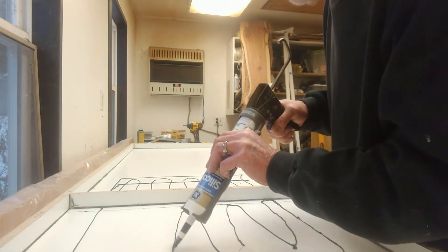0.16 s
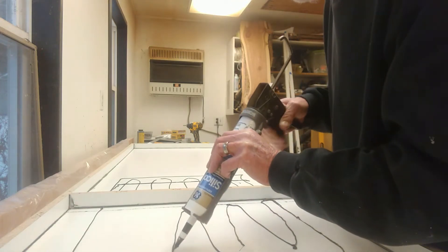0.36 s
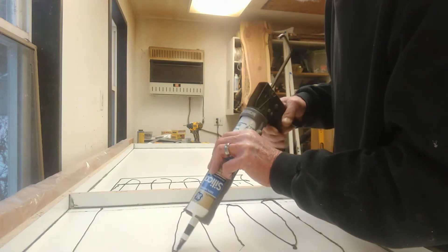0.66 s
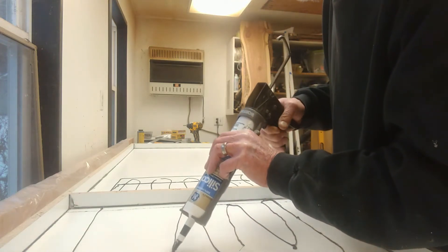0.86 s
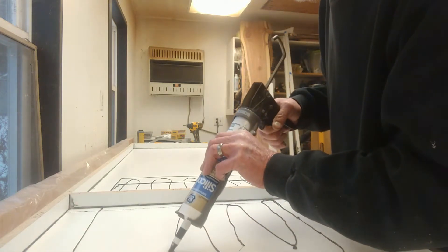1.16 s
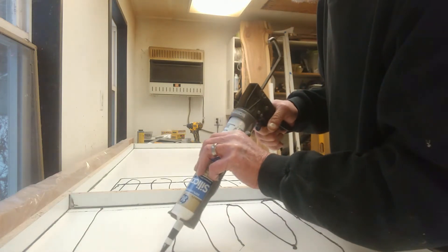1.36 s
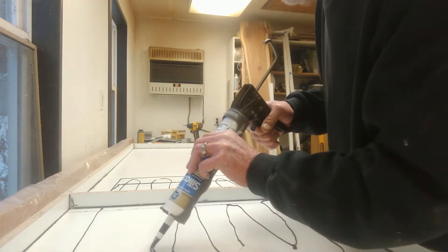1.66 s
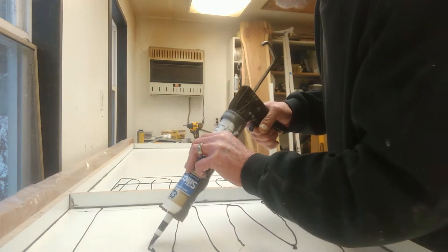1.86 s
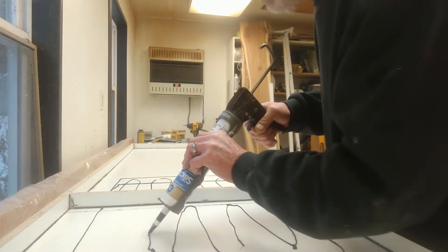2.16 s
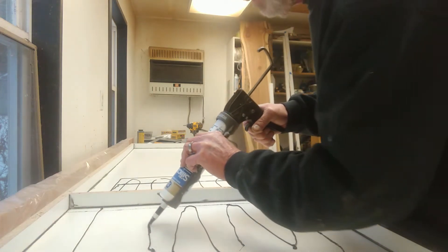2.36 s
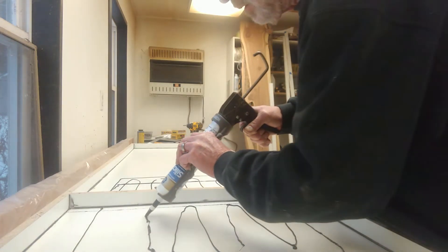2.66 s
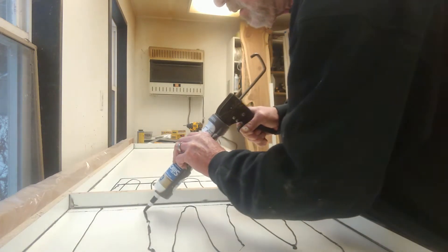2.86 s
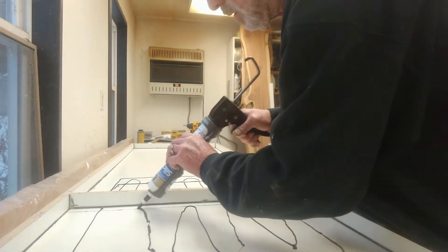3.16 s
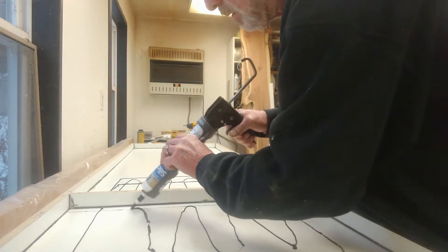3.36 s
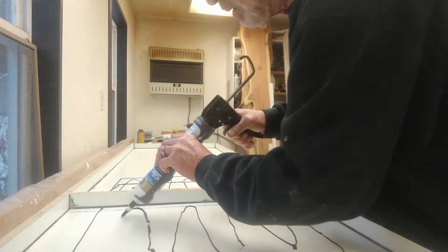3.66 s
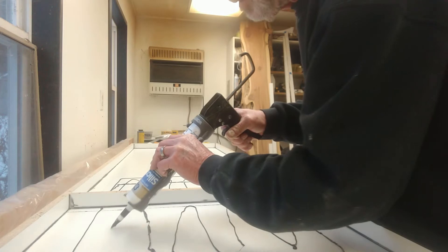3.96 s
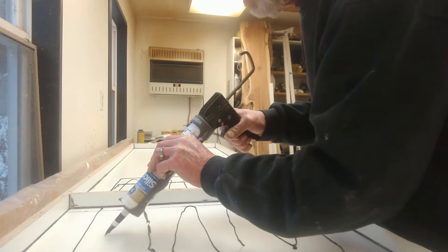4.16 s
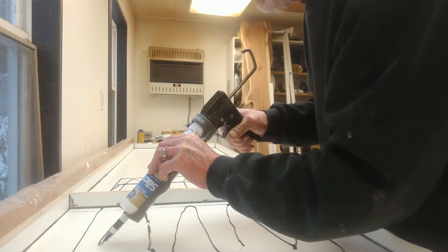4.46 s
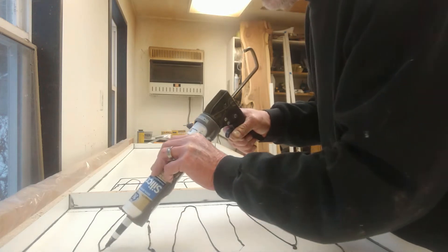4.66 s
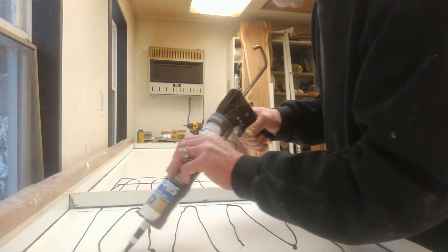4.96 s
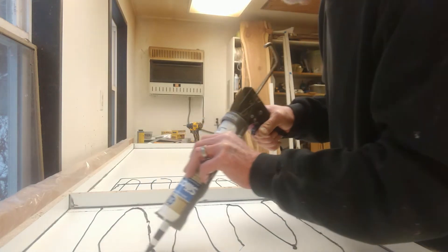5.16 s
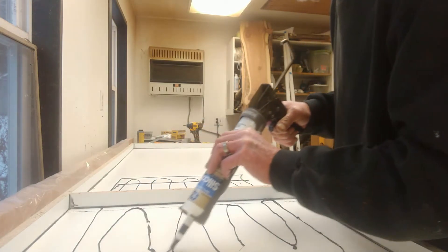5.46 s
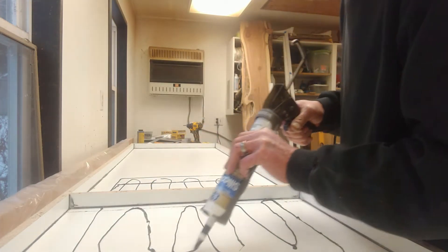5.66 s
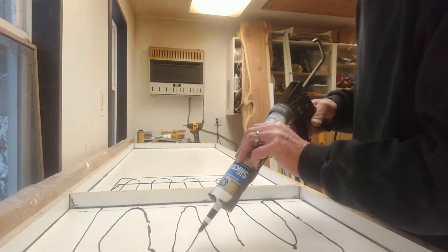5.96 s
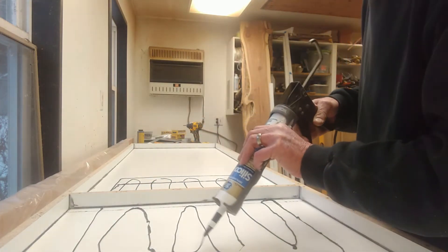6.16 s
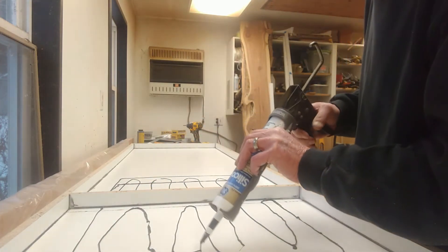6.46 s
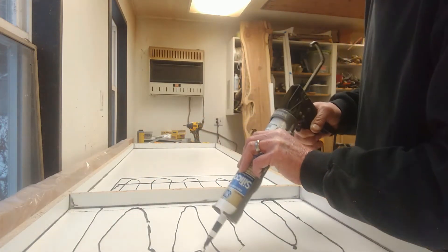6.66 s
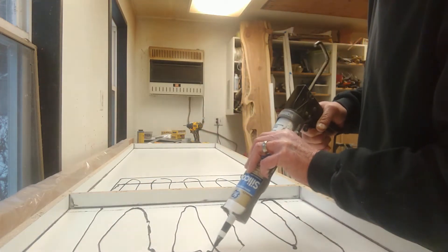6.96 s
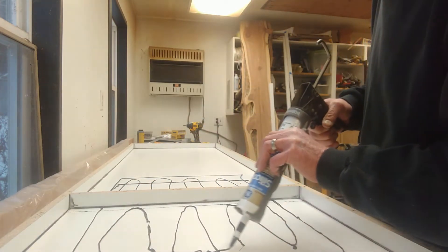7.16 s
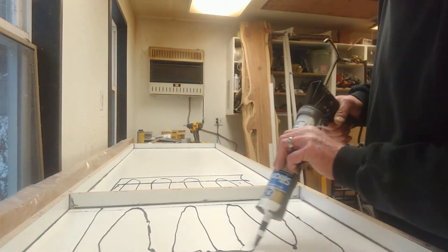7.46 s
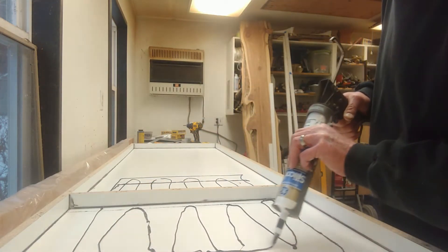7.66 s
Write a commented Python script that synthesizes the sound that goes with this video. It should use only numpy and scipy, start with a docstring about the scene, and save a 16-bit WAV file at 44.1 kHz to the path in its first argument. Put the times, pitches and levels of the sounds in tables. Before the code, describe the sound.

Close to the microphone in a small workshop, a caulking gun's trigger scrapes back and snaps brightly on steel. A squeeze brings a gritty, stuttering squeak, then irregular ticks, faint groans and a dull release knock. A second snap comes midway, then a quieter stretch, a short slide, a third snap and a longer fading squeeze. Fan rumble, mains hum and hiss dip after each snap.

```python
"""A hand caulking gun near a camera in a quiet workshop, over fan rumble, mains hum and hiss throughout.
The trigger slides back and snaps on the steel frame; a squeeze makes the rod stick, slip and squeak.
Ticks and cartridge groans (gliding noise) follow, a soft, dull trigger release, a second snap, then a
slide, a third snap and a long squeeze to the end. Snaps are noise bursts in bands, with rattle and echo.
The camera cross-feeds two ports to widen its stereo; its gain control ducks after every snap."""
import sys
import numpy as np
from scipy import signal
from scipy.fft import rfft, irfft, next_fast_len
from scipy.io import wavfile
from scipy.ndimage import uniform_filter1d, minimum_filter1d, map_coordinates

SR = 44100
rng = np.random.default_rng(int(sys.argv[2]) if len(sys.argv) > 2 else 0)


def wrap_up_sound(samples):
    """Save the sound to the file named by the first command line argument, as 16-bit audio."""
    columns = np.atleast_2d(samples).T
    # keep every value between -1 and 1, then stretch to whole-number steps
    tamed = np.clip(columns, -1, 1)
    steps = np.round(tamed * 32767).astype(np.int16)
    wavfile.write(sys.argv[1], SR, steps)


N = 345303


def amp(db):
    """dB to gain."""
    return 10 ** (np.asarray(db) / 20)


def unit(x):
    """Scaled to rms 1."""
    return x / np.sqrt(np.mean(x ** 2) + 1e-20)


def along(points, hz):
    """(Hz, value) points interpolated on a log frequency axis."""
    f, v = np.transpose(points)
    return np.interp(np.log(hz + 1), np.log(f + 1), v)


def curves(rows):
    """One value per sample for each column after the time."""
    s, *cols = np.transpose(rows)
    return [np.interp(np.arange(N) / SR, s, c) for c in cols]


def wobble(rate_hz):
    """A smooth random curve, rate_hz knots a second."""
    knots = rng.standard_normal(int(N * rate_hz / SR) + 4)
    return map_coordinates(knots, [np.arange(N) * rate_hz / SR])


def filtered(x, response):
    """x times a complex response of frequency."""
    m = next_fast_len(N + 8192)
    return irfft(rfft(x, m) * response(np.fft.rfftfreq(m, 1 / SR)), m)[..., :N]


def body(modes):
    """The causal response of a few resonances, signs alternating."""
    def response(f):
        return sum((-1) ** k * amp(db) * 1j * f * width_hz / (hz * hz - f * f + 1j * f * width_hz)
                   for k, (hz, width_hz, db) in enumerate(modes))
    return response


def sides(x, pan_db):
    """A mono sound on both ports, the left one pan_db louder."""
    return x * amp([[pan_db / 2], [-pan_db / 2]])


def diffuse(response, alike):
    """Stereo noise of rms 1, partly common to both ports."""
    common, left, right = rng.standard_normal((3, N))
    share = np.clip(alike, 0, 1)
    noise = np.sqrt(share) * common + np.sqrt(1 - share) * np.array([left, right])
    return unit(filtered(noise, response))


def stroke(start_s, length_s, attack_s, release_s):
    """Time since the start and a rise-hold-fall envelope; the fall follows the length."""
    u = np.arange(N) / SR - start_s
    shape = np.clip(u / attack_s, 0, 1) * np.clip((length_s - u) / release_s + 1, 0, 1)
    return np.clip(u, 0, None), shape ** 2


def narrow(noise, half_width_hz, hz):
    """Noise squeezed into one sharp mode that may glide."""
    slow = filtered(noise, lambda f: 1 / (1 + 1j * f / half_width_hz))
    return unit(slow * np.sin(2 * np.pi * np.cumsum(hz) / SR))


CRACK_T60_S = 0.0026  # the first instant of a contact


def contacts(rows, bands, t60s, crack):
    """Short bursts of noise: a sharp crack, then each band dies at its own speed."""
    out, t = np.zeros((2, N + SR)), np.arange(2048) / SR
    passes = [signal.butter(2, band, "band", fs=SR, output="sos") for band in bands]
    rise = 1 - np.exp(-t / 0.00015)
    fades = [rise * (amp(-60 * t / t60) + crack * amp(-60 * t / CRACK_T60_S)) for t60 in t60s]
    for s, *dbs, pan_db in rows:
        burst = np.zeros(len(t))
        for db, band, fade in zip(dbs, passes, fades):
            noise = signal.sosfilt(band, rng.standard_normal(len(t)) * fade)
            # energy of a sine of amplitude db under the same fade
            burst += amp(db) * noise * np.linalg.norm(fade) / np.linalg.norm(noise) / np.sqrt(2)
        start = round(s * SR)
        out[:, start:start + len(t)] += sides(burst, pan_db)
    return out[:, :N]


# Trigger snaps. Each row: start in seconds, strength in dB, body in dB, lean from upper to lower ring
# in dB, edge in dB, left over right in dB, slow part of the frame rattle in dB.
SNAPS = [(0.4318, -1, 7.5, -3, 1.5, -9.5, -30), (4.1084, -1, -6.5, 4, -1.5, -6, -32.5),
         (5.9910, 0, 0, -3, -6, -15.5, -31.5)]
# Bands of a snap. Each row: low and high edge in Hz.
SNAP_BANDS = [(40, 400), (400, 2000), (2000, 4300), (4300, 6400), (6400, 9000), (9000, 12300),
              (12300, 16000)]
# Fade of the ring. One t60 in seconds for each band.
SNAP_T60_S = [0.018, 0.0065, 0.0027, .008, 0.003, 0.0041, 0.0065]
# Colour of the steel contact. One ring level in dB for each band.
SNAP_COLOUR_DB = [-41, -34, -21, -19, -11, -10, -11.5]
# Reach of body, lean and edge. One share [factor] for each band.
SNAP_BODY = [0, 0.99, 1, 0.73, 0, 0, 0.056]
SNAP_LEAN = [0, 0, 0, 0, 1, -1, 0]
SNAP_EDGE = [0, 0, 0, 0, 0, 0, 1]


def trigger_snaps():
    """Steel on steel: one colour for every snap, with more or less body, ring and edge."""
    rows = []
    for s, db, body_db, lean_db, edge_db, pan_db, _ in SNAPS:
        band_db = db + np.array(SNAP_COLOUR_DB) + body_db * np.array(SNAP_BODY)
        band_db = band_db + lean_db * np.array(SNAP_LEAN) + edge_db * np.array(SNAP_EDGE)
        rows.append((s, *band_db, pan_db))
    return contacts(rows, SNAP_BANDS, SNAP_T60_S, crack=1.5)


# Frame resonances. Each row: centre in Hz, width in Hz, gain in dB, all before the response is squared.
FRAME = [(1246, 380, -4.5), (2420, 300, -3.5), (3330, 900, -2), (5220, 760, 0), (6100, 280, 0.5),
         (6440, 120, -1), (8030, 600, 0), (10170, 400, -2), (10800, 500, -1), (12100, 540, -6),
         (13100, 300, -5), (14600, 700, -8.5), (16840, 170, -6.5)]


def frame_rattle():
    """Loose parts of the frame rattle on after every snap, in its resonances."""
    t = np.arange(N) / SR
    fade = np.zeros(N)
    for s, *_, db in SNAPS:
        since = np.abs(t - s)
        fade += amp(db) * (t >= s) * (amp(-60 * since / 0.55) + 3 * amp(-60 * since / 0.034))
    return fade * diffuse(lambda f: body(FRAME)(f) ** 2 + 0.45 * (f > 1800), alike=0.16)


# Strokes of the trigger along the rod. Each row: start in seconds, length in seconds, handle level in dB,
# its swell by the end in dB, rod level in dB.
SLIDE = [(.295, 0.11, -59, -12, -69.5), (.366, 0.082, -59.5, 9.5, -53.5), (5.79, 0.19, -69, 18, -70),
         (5.918, 0.085, -59.5, 17.5, -50.5)]
# Handle modes, then rod modes. Each row: centre in Hz, width in Hz, gain in dB.
SLIDE_LOW = [(344, 160, 9.5), (820, 420, -3), (1653, 250, 4)]
SLIDE_HIGH = [(3220, 3200, -12.5), (5600, 2200, -11.5), (7300, 720, -12), (8950, 1500, -12.5),
              (11130, 1300, -10.5)]
SLIDE_EDGE_S = 0.0023


def slide():
    """Grainy friction excites handle and rod before the first and the last snap."""
    grit = rng.standard_normal(N) * amp(2.2 * wobble(150))
    handle = unit(filtered(grit, body(SLIDE_LOW)))
    rod = unit(filtered(grit, body(SLIDE_HIGH)))
    out = np.zeros(N)
    for s, length_s, handle_db, swell_db, rod_db in SLIDE:
        u, shape = stroke(s, length_s, SLIDE_EDGE_S, SLIDE_EDGE_S)
        handle_gain = amp(handle_db + swell_db * np.clip(u / length_s, 0, 1))
        out += shape * (handle_gain * handle + amp(rod_db) * rod)
    return sides(out, -1)


# Squeezes. Each row: start in seconds, length in seconds, rubbing in dB, squeak in dB,
# squeak once loaded in Hz.
SQUEEZE = [(0.677, 0.77, -55.5, -60.5, 1889), (6.371, 1.9, -51, -58.5, 1882)]
# Modes of the rubbing rod. Each row: centre in Hz, width in Hz, gain in dB.
RUB = [(2380, 380, 3.5), (3290, 480, 6.5), (3800, 860, 4), (4760, 430, 3.5), (5540, 1600, -3.5),
       (7400, 980, -35)]
RUB_ATTACK_S, RUB_FADE_DB_PER_S = 0.017, 17.5
SQUEAK_ATTACK_S, SQUEAK_FADE_DB_PER_S, RELEASE_S = 0.15, 12.5, 0.16
CREEP_HZ, CREEP_S = 110.9, 0.25  # the squeak starts this far flat and settles
SLIPS_FAST_HZ, SLIPS_SLOW_HZ, SLOWING_S = 100, 12, 0.5  # slip rate at the start and at last


def squeeze(s, length_s, rub_db, squeak_db, squeak_hz):
    """The rod sticks and slips, ever more slowly; slips and steady rubbing sound through its modes."""
    u, rub = stroke(s, length_s, RUB_ATTACK_S, RELEASE_S)
    sing = stroke(s, length_s, SQUEAK_ATTACK_S, RELEASE_S)[1]
    rate_hz = SLIPS_SLOW_HZ + (SLIPS_FAST_HZ - SLIPS_SLOW_HZ) * np.exp(-u / SLOWING_S)
    turns = np.floor(np.cumsum(rate_hz * amp(3 * wobble(40))) / SR)
    slips = np.diff(turns, prepend=0) * amp(2.5 * wobble(200)) * np.sqrt(SR / rate_hz)
    puffs = signal.lfilter([1], [1, -np.exp(-1 / (0.004 * SR))], slips)  # each slip a short scratch
    friction = (unit(puffs) + 0.54) * rng.standard_normal((2, N))
    # one sharp mode creeps upward as the load grows
    mode_hz = squeak_hz - CREEP_HZ * np.exp(-u / CREEP_S)
    squeak = narrow(friction + 1.6 * rng.standard_normal((2, N)), 22, mode_hz)
    rubbing = rub * amp(rub_db - RUB_FADE_DB_PER_S * u) * unit(filtered(friction, body(RUB)))
    return rubbing + sing * amp(squeak_db - SQUEAK_FADE_DB_PER_S * u) * squeak


# Groans as pressure builds. Each row: start in seconds, length in seconds, level in dB,
# start pitch in Hz, end pitch in Hz.
GROANS = [(.72, 0.36, -68.5, 1334, 1103), (2.596, 0.32, -64.5, 1198, 1251),
          (4.498, 0.35, -68.5, 1159, 1284), (6.31, 0.34, -64, 1191, 1191)]
GROAN_HALF_WIDTH_HZ, GROAN_ATTACK_S, GROAN_RELEASE_S = 75, 0.049, 0.026


def groans():
    """Narrow, slowly gliding noise in one mode of the cartridge."""
    out = np.zeros(N)
    for s, length_s, db, start_hz, end_hz in GROANS:
        u, shape = stroke(s, length_s, GROAN_ATTACK_S, GROAN_RELEASE_S)
        hz = start_hz + (end_hz - start_hz) * np.clip(u / length_s, 0, 1)
        out += amp(db) * shape * narrow(rng.standard_normal(N), GROAN_HALF_WIDTH_HZ, hz)
    return sides(out, -3.1)


# Ticks of rod, grip plate and tube. Each row: start in seconds, level at the brightest in dB,
# brightness in octaves above 1 kHz, dull body in dB.
TICKS = [(0.185, -48.5, 1.2, -52), (0.3653, -38.5, 3.4, -61), (0.6571, -54, 2, -42.5),
         (0.7113, -35, 1.95, -40), (0.7284, -49, 3, -60), (0.7811, -53, 2.9, -51.5),
         (0.8072, -50, 1.7, -54), (0.8294, -55, 2, -55), (0.9287, -47.5, 3.3, -57),
         (0.9746, -39.5, 3.9, -62), (1.0547, -38.5, 3.9, -74), (1.2111, -36.5, 3.93, -64),
         (1.3127, -44, 3.9, -65), (1.3855, -54, 2.6, -73), (1.4019, -48.5, 3.1, -66),
         (1.4637, -49.5, 3.5, -60), (1.6461, -44.5, 3.3, -70), (1.7239, -46.5, 2.5, -51.5),
         (1.781, -43, 3.36, -69), (1.8409, -44.5, 0.92, -61), (2.041, -41.5, 3.35, -63),
         (2.0614, -44.5, 2.6, -50.5), (2.1142, -52.5, 1.5, -54), (2.1499, -42.5, 3.36, -60),
         (2.2413, -42, 3.5, -58), (2.2689, -48, 2, -45), (2.4076, -43.5, 3.1, -68),
         (2.4302, -41, 2.44, -44.5), (2.4508, -48, 3.1, -46.5), (2.4875, -51.5, 3.4, -74),
         (2.5303, -53, 1.86, -49), (2.5762, -50, 3.1, -59), (2.679, -40.5, 2, -49),
         (2.8413, -41.5, 1.9, -49.5), (2.9121, -42.5, 2.4, -59), (3.2258, -49.5, 3.8, -70),
         (3.2964, -46, 1.97, -52), (3.4413, -49, 1.3, -59), (3.5621, -45, 1.7, -59), (3.588, -53, 2.5, -51),
         (3.7649, -48, 3.6, -73), (3.8862, -39, 4.26, -68), (4.6964, -49, 1.3, -69.5),
         (5.5762, -43, 3, -63), (5.6742, -51, 1.3, -59.5), (5.7585, -45, 2.2, -69.5),
         (5.7703, -56, 2.6, -49.5), (5.8901, -45.5, 3.6, -51), (6.3926, -52, 1.7, -54.5),
         (6.4309, -50, 4.1, -57), (6.442, -47, 1.4, -62), (6.4648, -43.5, 3.8, -66),
         (6.4828, -48, 1.9, -65), (6.5023, -48, 2.5, -58), (6.6787, -57, 1.9, -62),
         (6.7231, -40.5, 3.6, -71), (6.7765, -43, 3.3, -44.5), (6.8543, -53.5, 2.6, -68.5),
         (6.8893, -39, 3.8, -70), (6.9223, -35.5, 2.46, -38), (6.9597, -41.5, 3.4, -51.5),
         (7.0303, -42, 3.6, -60), (7.0474, -52, 1.4, -55), (7.0706, -56, 2.1, -67), (7.1076, -51, 1.6, -62),
         (7.159, -44.5, 1.1, -55), (7.1845, -39, 3.9, -68), (7.2246, -49, 1.06, -58),
         (7.319, -44.5, 3.5, -57.5), (7.3304, -47, 2.6, -53), (7.3712, -49, 3.9, -67),
         (7.7057, -39, 3.7, -63)]
# Bands of a tick, dull body first. Each row: low and high edge in Hz.
TICK_BANDS = [(800, 1800), (2300, 4200), (4500, 8000), (8000, 16000)]
# Fade of a tick. One t60 in seconds for each band.
TICK_T60_S = [0.029, 0.012, 0.013, 0.009]
FAINT_TICKS, FAINT_DB, FAINT_SPREAD_DB = 20, -56, 2  # scattered at random
TICK_FALL_DB, TICK_PAN_DB = 6, -7  # loss one octave off the brightness; left over right


def ticks():
    """A tick has a dull body; above that it is loudest at its brightness and falls away on both sides."""
    faint = [(a * N / SR, FAINT_DB + FAINT_SPREAD_DB * (2 * b - 1), 1 + 1.8 * c, FAINT_DB - 7.5)
             for a, b, c in rng.random((FAINT_TICKS, 3))]
    octaves = np.log2(np.sqrt(np.prod(TICK_BANDS[1:], axis=1)) / 1000)  # band centres above 1 kHz
    rows = [(s, body_db, *(db - TICK_FALL_DB * (octaves - bright) ** 2), TICK_PAN_DB)
            for s, db, bright, body_db in TICKS + faint]
    return contacts(rows, TICK_BANDS, TICK_T60_S, crack=0.41)


# Soft trigger release. Each row: start in seconds, knock in dB, thud in dB.
RELEASES = [(2.26, -44, -56), (2.2675, -44, -47.5), (2.31, -53, -52.5)]
# Fingers on the handle. Each row: start in seconds, level in dB.
TAPS = [(0.32, -48), (5.806, -43.5), (5.887, -47), (5.927, -45)]
# Modes of gun body, thud and handle. Each row: pitch in Hz, level in dB, t60 in seconds.
GUN_BODY = [(888, 3.5, 0.042), (1057, -4, 0.068), (540, -8, 0.07)]
THUD = [(137, -0.5, 0.34), (70, -5, .15)]
HANDLE = [(344, 3, 0.046), (885, -12.5, 0.017)]


def release_and_taps():
    """Soft trigger release, knock and thud of the gun, and taps on the handle, as decaying sines."""
    out, t = np.zeros(N + SR), np.arange(SR // 4) / SR

    def ring(modes):
        tones = sum(amp(db - 60 * t / t60) * np.sin(2 * np.pi * hz * t) for hz, db, t60 in modes)
        return tones * (1 - np.exp(-t / 0.0011))

    for s, knock_db, thud_db in RELEASES:
        out[round(s * SR):][:len(t)] += amp(knock_db) * ring(GUN_BODY) + amp(thud_db) * ring(THUD)
    for s, db in TAPS:
        out[round(s * SR):][:len(t)] += amp(db) * ring(HANDLE)
    return sides(out[:N], 0)


# Decay of the room. Each row: frequency in Hz, t60 in seconds.
WALLS = [(300, 0.12), (1500, 0.29), (5000, 0.3), (15000, 0.07)]


def walls(x):
    """Each frequency of the room's answer dies at its own speed."""
    hz, t, z = signal.stft(rng.standard_normal((2, SR // 2)), SR, nperseg=256)
    tail = signal.istft(z * amp(-60 * t / along(WALLS, hz)[:, None]), SR, nperseg=256)[1]
    late = np.pad(x.mean(0), (200, 0))[None]
    return signal.fftconvolve(late, tail / np.linalg.norm(tail[0]), axes=1)[:, :N]


# Swell of the room noise. Each row: time in seconds, fan level in dB.
ROOM = [(0, -59), (1.7, -63.5), (2.1, -60), (2.45, -56.5), (3.1, -61.5), (4.1, -64), (4.7, -59.5),
        (5.1, -65), (5.35, -60), (5.6, -62.5), (5.9, -58.5), (6.6, -61.5), (7.3, -60.5), (7.83, -59.5)]
# Spectra of fan and hiss. Each row: frequency in Hz, relative density in dB per Hz.
FAN = [(20, -11.5), (50, -2.5), (120, 0.5), (300, -3.5), (700, -7.5), (1400, -15.5), (2200, -29),
       (5000, -35.5)]
HISS = [(300, -22.5), (1500, 0.5), (3000, 0), (5200, -2), (8000, -2.5), (12000, -3.5), (16500, -7.5)]
# Fan housing modes. Each row: centre in Hz, width in Hz, gain in dB.
DRONE = [(85, 14, -8), (134, 15, 0)]
# Mains overtones. Each row: pitch in Hz, rms level in dB before a slight wobble.
HUM = [(240, -67), (360, -78), (480, -85.5), (840, -77)]
HISS_DB, HISS_FOLLOWS = -65.5, 0.94  # mean level; share of the fan's swells


def workshop():
    """Fan rumble and drone, slightly unsteady mains hum and a broad hiss."""
    fan_db, = curves(ROOM)
    hiss_db = HISS_DB + HISS_FOLLOWS * (fan_db - fan_db.mean())
    t = np.arange(N) / SR
    fan = amp(fan_db + 1.3 * wobble(6)) * diffuse(lambda f: amp(along(FAN, f)), alike=0.4)
    drone = amp(-65.5) * diffuse(body(DRONE), alike=0.33)
    hum = np.zeros((2, N))
    for hz, db in HUM:
        phase = 2 * np.pi * hz * t + 0.5 * wobble(6) + [[0], [1.2]]
        hum += amp(db + 1.1 * wobble(2.8)) * np.sqrt(2) * np.sin(phase)
    hiss = amp(hiss_db + 0.82 * wobble(6)) * diffuse(lambda f: amp(along(HISS, f)), alike=0.024)
    return fan + drone + hum + hiss


def scene():
    """The gun, its echo in the room, and the room noise."""
    snaps = trigger_snaps()
    small = ticks() + slide() + sum(squeeze(*row) for row in SQUEEZE) + groans() + release_and_taps()
    echo = walls(amp(-1.5) * snaps + amp(-5.5) * small)
    return snaps + frame_rattle() + small + echo + workshop()


def gain_control(x, limit_db, depth_db, start_db, hold_s, recover_s):
    """Ducks a few ms after a loud peak, holds, then recovers ever more slowly."""
    t = np.arange(N) / SR
    power = np.abs(uniform_filter1d(np.mean(x ** 2, 0), size=89, origin=44))
    level_db = 10 * np.log10(power + 1e-12)
    hold = int(hold_s * SR) // 2
    need_db = -np.clip(level_db - limit_db, 0, depth_db)
    need_db = minimum_filter1d(need_db, size=2 * hold + 1, origin=hold, mode="nearest")
    need_db[0] = start_db
    # running maximum of the cut, shrinking exponentially in dB
    log_cut = np.maximum.accumulate(np.log(np.abs(need_db) + 1e-9) + t / recover_s) - t / recover_s
    return x * amp(uniform_filter1d(-np.exp(log_cut), size=441, origin=220, mode="nearest"))


# Cross-feed. Each row: frequency in Hz, share of the other port [factor].
CROSS = [(100, 0.41), (2000, 0.51), (6000, 0.42), (15000, .42)]
# Right port response. Each row: frequency in Hz, gain in dB.
RIGHT_PORT = [(40, -1), (120, -2.5), (300, -2.5), (1000, -1), (2500, 2.5), (4000, -0.5), (8000, 0.5),
              (10000, 3), (13500, 4.5), (16000, 9)]
TOP_HZ, SELF_NOISE_DB = 15950, -78


def record(dry):
    """Each port loses a late copy of the other (a comb); then colour, gain control, own hiss, band limit."""
    def late(f, delay_s):
        return np.exp(-2j * np.pi * f * delay_s)

    wide = dry - filtered(dry[::-1], lambda f: along(CROSS, f) * late(f, 0.000457))
    ports = filtered(wide, lambda f: np.array([late(f, 0.00003), amp(along(RIGHT_PORT, f))]))
    ducked = gain_control(ports, limit_db=-42.5, depth_db=17, start_db=-6.5, hold_s=0.18, recover_s=0.8)
    noisy = ducked + amp(SELF_NOISE_DB) * diffuse(lambda f: amp(along(HISS, f)), alike=0.05)
    limited = noisy / (1 + np.abs(noisy) ** 8) ** 0.125  # soft limit at full scale
    return filtered(limited, lambda f: 1 / (1 + (f / TOP_HZ) ** 120))


dry = scene()
out = record(dry)
wrap_up_sound(out)
```